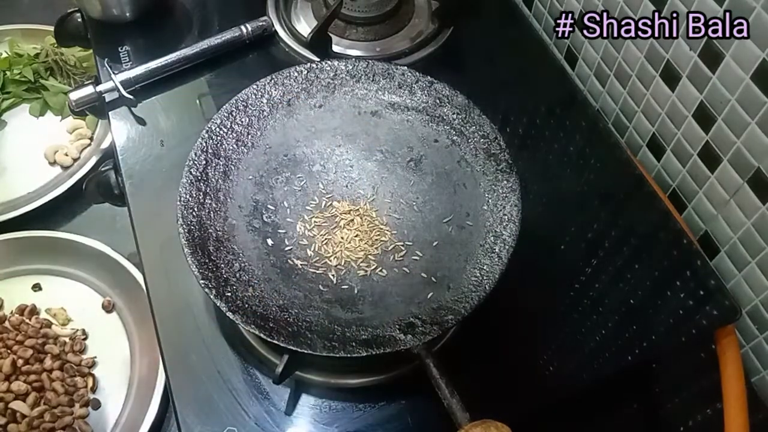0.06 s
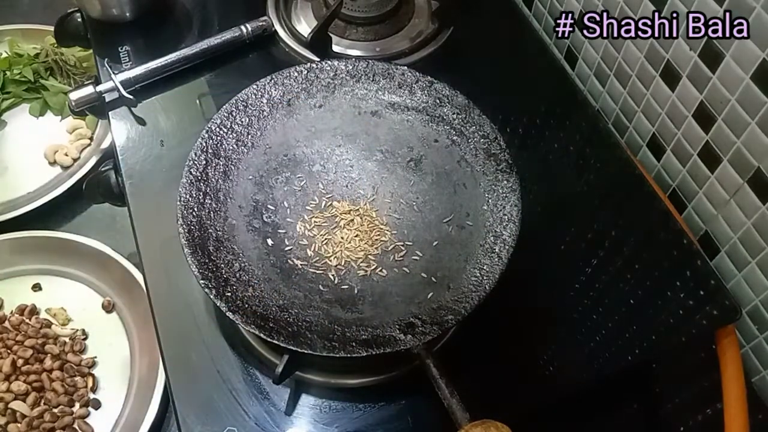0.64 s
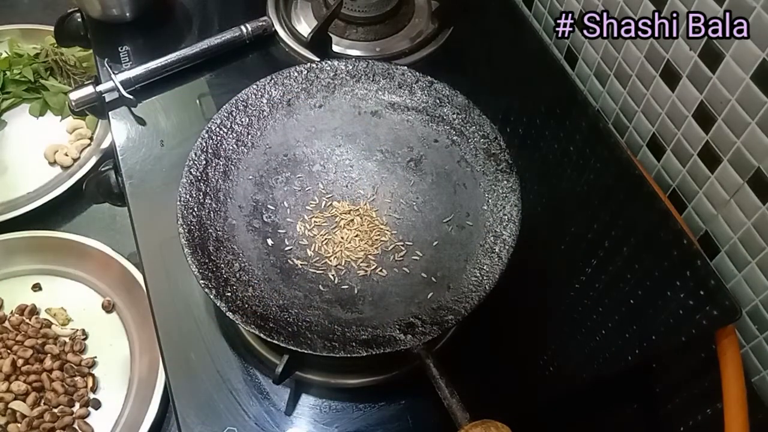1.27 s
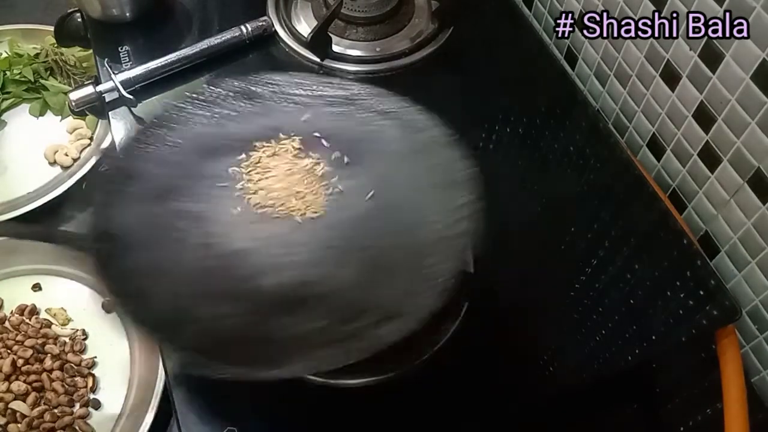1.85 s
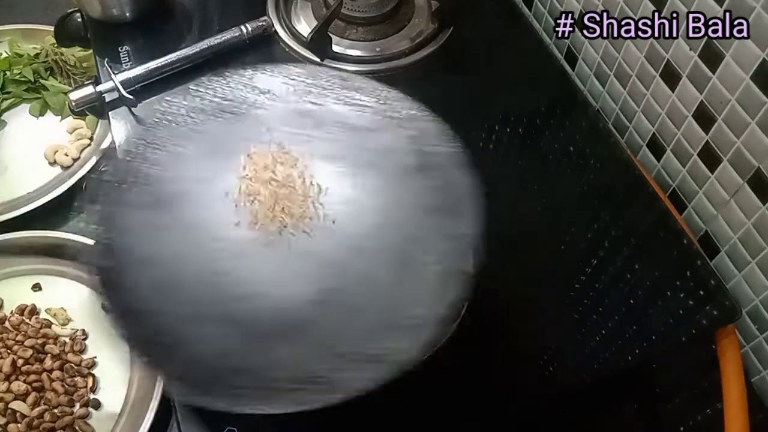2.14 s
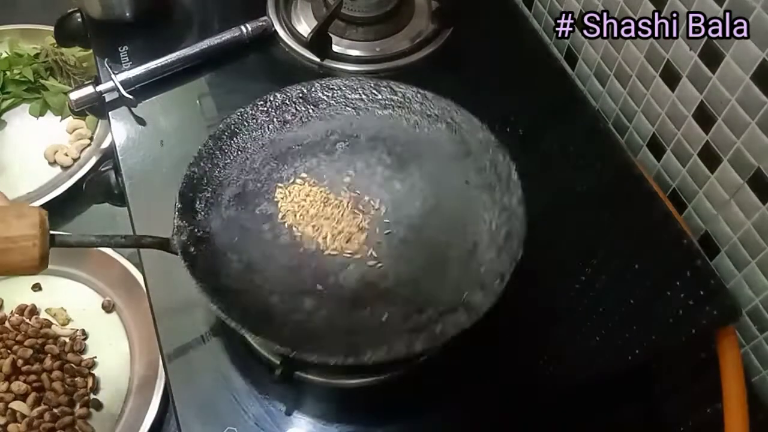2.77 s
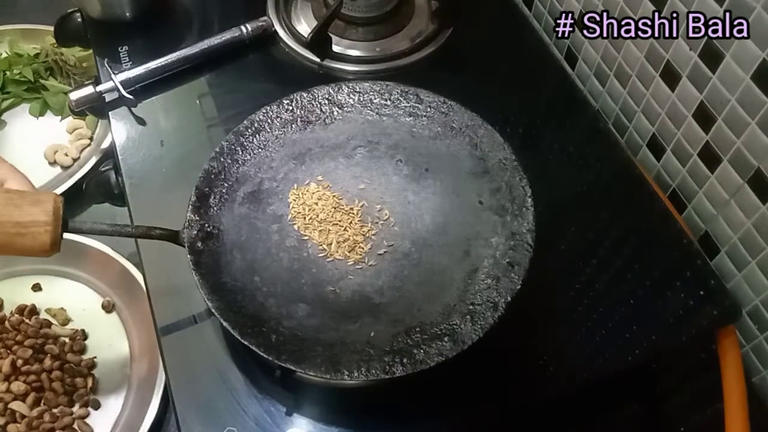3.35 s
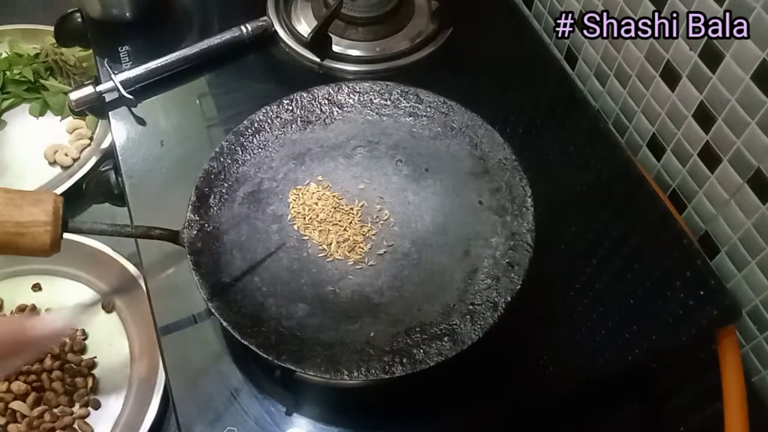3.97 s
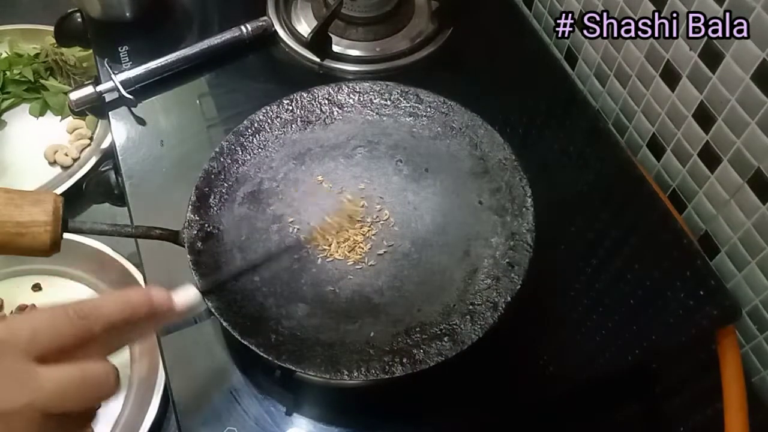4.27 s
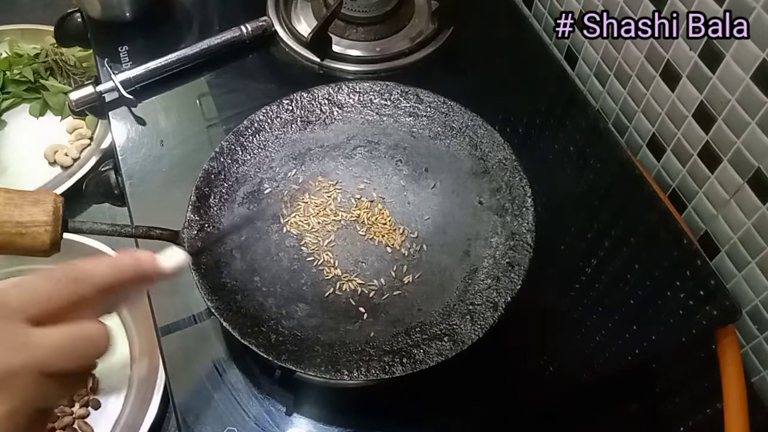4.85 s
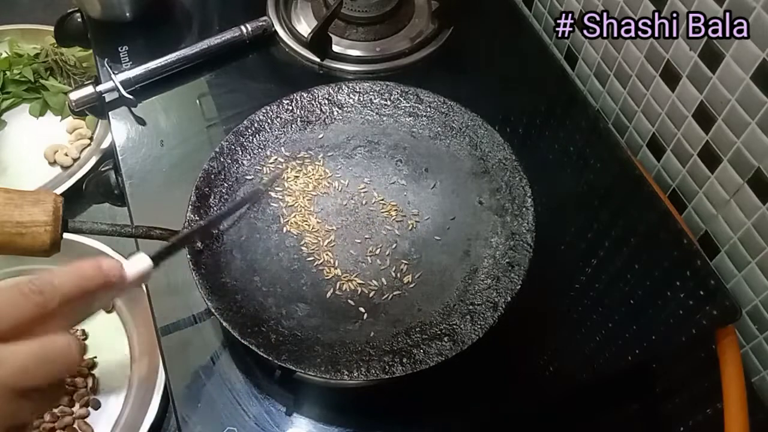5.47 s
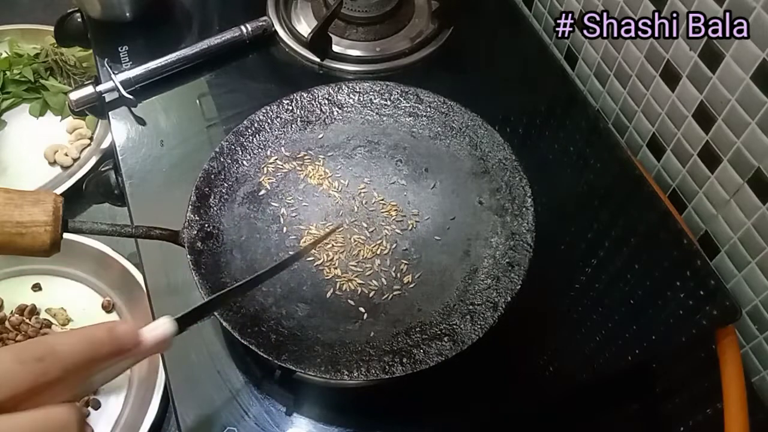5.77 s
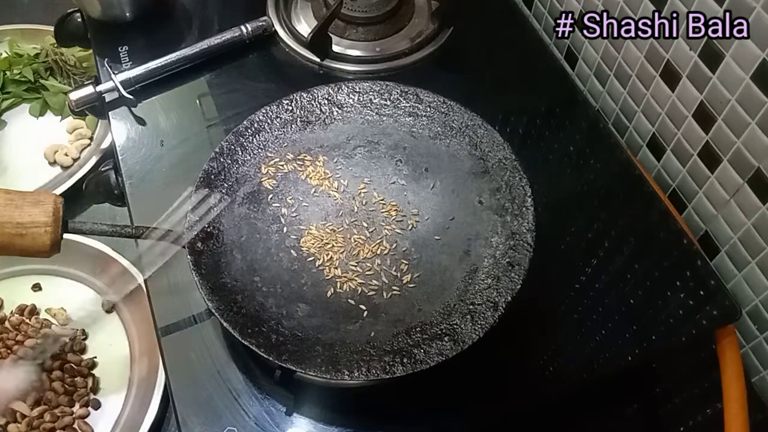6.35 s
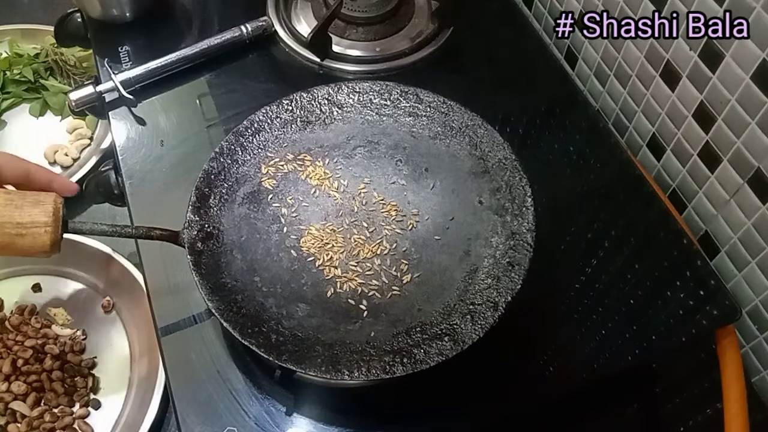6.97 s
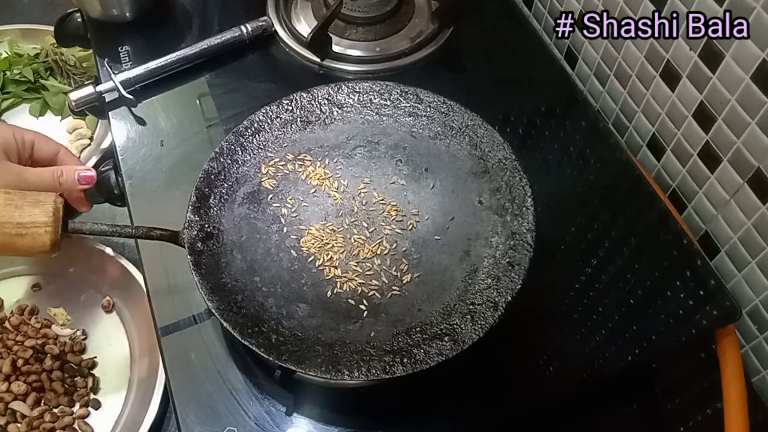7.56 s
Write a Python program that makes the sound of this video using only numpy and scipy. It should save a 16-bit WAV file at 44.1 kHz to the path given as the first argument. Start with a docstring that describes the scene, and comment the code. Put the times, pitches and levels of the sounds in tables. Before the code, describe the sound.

In a small, quiet kitchen, a nearby microphone picks up seeds popping one by one in a hot iron pan. The pan clanks down on its grate, and a spoon stirs with a few ringing scrapes. After the soft slide of a plate come two loud metallic knocks on the rim, then more snaps and light knocks on the counter. Faint raspy squeaks and a thin trill lie in the background.

```python
"""Seeds roast and crack in a heavy iron pan on a gas stove, heard on one microphone in a small tiled kitchen.
The iron rings as the pan is lifted, swirled and dropped back on its grate; a steel spoon stirs,
then knocks twice on the rim. Hot husks split with sharp snaps over a faint fizz, the counter takes
a few knocks and a plate is slid aside. Farther back are thin raspy squeaks and a faint trill."""
import sys
import numpy as np
from scipy import signal
from scipy.io import wavfile
from scipy.ndimage import uniform_filter1d, minimum_filter1d

SR = 44100
rng = np.random.default_rng(int(sys.argv[2]) if len(sys.argv) > 2 else 0)


def master_out(mix):
    """Clip the mix to full scale and print it as 16-bit PCM to the path in sys.argv[1]."""
    frames = np.transpose(np.atleast_2d(mix))
    ceiling = np.clip(frames, -1, 1)
    pcm = np.round(ceiling * 32767).astype(np.int16)
    wavfile.write(sys.argv[1], SR, pcm)


N = 340452
TIME = np.arange(N) / SR

# Blows around the stove. Each row: start in seconds, level in dB, bass in dB, treble in dB,
# ring against clatter in dB, factor on the decay time.
COUNTER_KNOCKS = [(.1083, -51.5, -15, 5, -33, 0.34), (.345, -37, -12, 20, -29, 0.34),
                  (7.4765, -38.5, -18, 3, -27, 1), (7.487, -33, -2, 3, -21, 1.0),
                  (7.592, -42.5, -13, -2, -33, 0.23), (7.676, -43, -7, -3, -20, 0.4)]
GRATE_BLOWS = [(1.828, -48.5, -6, 25, -13, 0.6), (2.9395, -22.5, 3.5, -3, 5.5, 0.67),
               (2.956, -17.5, -4.5, 3, -5, 1.01), (3.055, -20, 1, -1.5, -3, 1.005),
               (3.265, -40.5, 7.5, 2, -11, 1.27), (3.375, -43, 5, -8, -4, 1.13),
               (3.468, -36, 5, 3, -5, 0.58), (3.480, -34.5, -7.5, 21.5, -25, 0.72)]
SPOON_TOUCHES = [(4.2705, -23.5, -12.5, -6, 1, 0.99), (4.601, -44, 3, -29, -14, 0.27),
                 (4.622, -37, -7.5, -16.5, 5, 0.99), (5.239, -31.5, -9, -5.5, 3, 0.77),
                 (7.054, -33.5, -4.5, 11.5, -9, 0.58)]
RIM_KNOCKS = [(6.1203, -15, 2.5, -3.5, 0.5, 0.82), (6.3265, -13, -1, -1.5, 0.5, 0.89)]
# Raspy squeaks. Each row: start in seconds, length in seconds, level in dB, top pitch in Hz.
SQUEAKS = [(0, 0.14, -57.5, 1438), (1.293, 0.41, -58, 1466), (1.61, 0.32, -58, 1460),
           (1.977, 0.32, -46, 1452), (3.419, 0.5, -56.5, 1448), (4.142, 0.17, -51.5, 1420)]
# A squeak's partials. Each row: multiple of the pitch, width in Hz, relative level in dB.
SQUEAK_PARTIALS = [(1, 50, -3.5), (1.998, 213, 11), (2.34, 136, -9.5), (2.83, 181, -1), (3.69, 180, -4.5),
                   (4.08, 243, -1.5), (4.9, 690, -4)]
# Handling noises. Each row: start in seconds, level in dB, pitch in Hz, width in Hz, length in seconds.
BUMPS = [(0.99, -67, 950, 200, 0.11), (1.816, -49.5, 892, 70, 0.027), (1.87, -42, 478, 44, 0.04),
         (1.871, -48, 970, 300, 0.046), (1.865, -48, 3250, 1510, 0.052), (2.549, -56.5, 1730, 348, 0.03),
         (4.14, -53.5, 3970, 60.3, 0.055), (4.88, -59.5, 765, 98, 0.36), (4.915, -64, 1490, 86, 0.27),
         (5.361, -61, 411, 61, 0.41), (6.585, -41, 4120, 510, 0.038), (6.869, -60.5, 773, 88.7, 0.21),
         (7.037, -59.5, 666, 39.7, 0.3)]
# Sharp snaps: seeds cracking and, last, the hard click of a knock on the counter.
# Each row: start in seconds, level in dB, then low push and room against the snap in dB.
SNAPS = [(1.7228, -31, -35, -2), (2.2261, -11.5, 5.5, -2), (2.2886, -8.5, 5, 5), (2.4262, -19.5, -37, 0.5),
         (2.9486, -19, -33, 3), (3.3407, -10, -7, 2), (3.4803, -29, -13, 14.5), (3.643, -33.5, -23, 0.5),
         (3.9267, -21, -34, 4.5), (3.9784, -28.5, -24, -3), (4.2207, -10, -54, -1.5),
         (4.7326, -6.5, -31, 0.5), (4.8324, -6, 8, 2.5), (4.9476, -16.5, -32, 1.5), (6.4865, -18, -39, 4),
         (6.6124, -21.5, -28, 2), (7.2023, -30.5, -22, 4), (7.2112, -18.5, -38, 4),
         (7.2614, -13, -30, -2.5), (7.487, -15, -28, -2)]
# Strokes over the iron. Each row: start in seconds, length in seconds, level in dB, favoured note in Hz.
STROKES = [(1.763, 0.4, -55.5, 2426), (2.266, .14, -51, 2390), (2.478, 0.21, -49, 2356),
           (2.72, 0.081, -51, 2520), (4.302, 0.1, -25, 2493), (4.643, 0.082, -34.5, 2687),
           (4.987, 0.071, -43, 2450), (5.346, 0.12, -54.5, 2530), (5.476, 0.08, -61.5, 2380),
           (5.63, 0.083, -51, 2430)]

# The tone colour of each source. Each row: frequency in Hz, relative level in dB.
AIR_COLOUR = [(15, -43), (25, -8.5), (43, -10.5), (88, 5), (182, 2), (387, -3), (438, -3.5), (578, -1),
              (908, -0.5), (1260, -16), (2030, -11.5), (2240, -14), (2740, -20.5), (8290, -23),
              (10100, -56), (13200, -60), (22000, -120)]
COUNTER_COLOUR = [(35, -69), (60, -40), (307, 5.5), (547, -1.5), (636, 6), (977, -2), (1180, 1), (1290, -1),
                  (1600, -1.5), (3860, -11), (8000, -10.5), (10100, -26.5), (13200, -80), (22000, -120)]
SNAP_COLOUR = [(200, -27.5), (1000, -20), (2000, -14), (3500, -9.5), (6000, -4), (8000, -0.5), (9000, -6),
               (10500, -19.5), (14000, -37.5), (16000, -44)]
RUB_COLOUR = [(120, -72), (200, -21.5), (367, -13), (545, -29), (2060, -34.5), (2470, 4.5), (2680, -0.5),
              (2900, -10.5), (3250, -18.5), (3510, -4), (3800, -24.5), (4120, -10), (4350, -24.5),
              (6500, -18), (8600, -13), (10100, -28.5), (13200, -76.5), (22000, -120)]
GRATE_COLOUR = [(29, -64), (50, -43.5), (82, -16.5), (133, -29), (259, -6.5), (451, -11), (482, -5.5),
                (879, -2), (2090, -16), (2500, -9.5), (3730, -21.5), (5200, -26), (6940, -33),
                (8480, -28.5), (10100, -58), (13200, -74.5), (22000, -120)]
TOUCH_COLOUR = [(59, -86.5), (100, -31.5), (172, -16.5), (253, -4), (478, -8), (791, -8), (1060, -8),
                (1750, -28), (2380, -9.5), (2940, -7.5), (3430, -10), (5900, -5.5), (6620, -12.5),
                (8510, -7.5), (10100, -24), (13200, -50), (22000, -120)]
SLIDE_COLOUR = [(59, -53), (100, -37), (234, -29), (278, -16), (358, -18.5), (497, -6), (580, -21),
                (746, -9), (997, -12.5), (1650, -17), (3120, -24), (5670, -37.5), (8190, -40.5),
                (10100, -62), (13200, -107), (22000, -120)]
RIM_COLOUR = [(35, -69.5), (60, -32), (150, -40), (240, -15), (405, -13.5), (432, -3), (536, -27.5),
              (664, -3.5), (1060, -11.5), (1240, -4.5), (1380, -20.5), (1570, -7.5), (1940, -12.5),
              (2460, -5.5), (3860, -20), (4330, -22.5), (4714, -18.5), (4900, -26), (8530, -25.5),
              (10100, -46), (13200, -86), (22000, -120)]
# Modes of the iron pan and the cast grate. Each pair of lists: frequencies in Hz, strengths in dB.
PAN_HZ, PAN_DB = [435, 494, 672, 1197, 1247, 1593, 1711, 2066, 2327, 2402, 2534, 2665, 2729, 3010, 3214,
                  3495, 3632, 4140, 4340, 4530, 4714, 4827, 5021, 5299, 5528, 5705, 6060, 6124, 7187, 7260,
                  7435, 8290, 8560, 8839], [-9, -4, -6.5, -13.5, -6.5, 0.5, -1.5, 2, -10, 2, -3, -10.5, -5, 3.5, -2,
                                  -2, -2.5, 7.5, 9, 1.5, 3.5, 5, 7, 7, -0.5, 6, 6.5, 8.5, 0, 6, 3.5, 6.5,
                                  10, 6.5]
GRATE_HZ, GRATE_DB = [377, 490, 743, 1120, 1244, 2380, 2535, 2889, 3020, 3488, 4230, 4474, 4673, 5012, 8193,
                      8700], [-2.5, -6, -6.5, -9.5, -11, 2, 6, 8, -0.5, 6, 5.5, 4.5, -4, 6, 11.5,
                                        2.5]
# How kitchen, clatter and iron die away. Each row: frequency in Hz, nominal seconds to fall 60 dB.
ROOM_DECAY = [(200, 0.2), (2000, 0.24), (5000, 0.23), (9000, .21), (14000, 0.21)]
CLATTER_DECAY = [(100, 0.75), (400, 0.54), (1000, 0.48), (2500, 0.41), (5000, .33), (8500, 0.29),
                 (13000, 0.56)]
IRON_DECAY = [(430, 0.62), (900, 0.56), (1400, 0.82), (2100, 0.31), (4000, 0.36), (4750, 0.44), (6000, 0.4),
              (7300, 0.37), (9000, 0.19), (12000, 0.31)]


def amp(db):
    return 10 ** (np.asarray(db) / 20)


def unit_rms(x):
    return x / np.sqrt(np.mean(x ** 2) + 1e-20)


def value_at(points, hz):
    """A curve's value, on a log-frequency axis."""
    f, value = np.transpose(points)
    return np.interp(np.log(hz + 1), np.log(f + 1), value)


def add(mix, start, sound):
    """Lays a sound into the mix, start seconds in."""
    part = mix[max(round(start * SR), 0):][:len(sound)]
    part += sound[:len(part)]


def colour(x, points, size=4096):
    """Causal filter with the given spectrum, so attacks stay sharp."""
    log_gain = np.log(amp(value_at(points, abs(np.fft.fftfreq(size, 1 / SR)))))
    taps = np.fft.ifft(np.exp(np.conj(signal.hilbert(log_gain)))).real
    return signal.oaconvolve(x, taps[:size // 2])[:len(x)]


def resonate(x, hz, width_hz):
    """A steep resonance that can follow a moving frequency."""
    carrier = np.exp(2j * np.pi * np.cumsum(hz * np.ones(len(x))) / SR)
    pole = np.exp(-np.pi * width_hz / SR)
    return unit_rms((carrier * signal.lfilter([1], [1, -2 * pole, pole * pole], x / carrier)).real)


def dying_noise(decay, stretch=1, uneven=0):
    """One second of dense reflections, each band dying at its own speed; if uneven, some hang on."""
    hz, t, bands = signal.stft(rng.standard_normal(SR), SR, nperseg=256)
    t60 = value_at(decay, hz) * stretch * np.exp(uneven * (2 * rng.random(len(hz)) - 1))
    return signal.istft(bands * amp(-60 * t / t60[:, None]), SR, nperseg=256)[1][:SR]


def room(x):
    """What the kitchen tiles send back to the microphone: a short tail of unit energy."""
    tail = dying_noise(ROOM_DECAY)
    return signal.fftconvolve(x, tail / np.linalg.norm(tail))[:len(x)]


def ringing(modes, touch_db, stretch=1):
    """Struck iron's dying modes; where it is touched sets their phases and shifts their strengths."""
    t = np.arange(SR * 3 // 4) / SR
    out = np.zeros(len(t))
    for hz, db in modes:
        strength = amp(db + touch_db * (2 * rng.random() - 1))
        t60 = stretch * value_at(IRON_DECAY, hz)
        out += strength * amp(-60 * t / t60) * np.sin(2 * np.pi * (hz * t + rng.random()))
    return out


def stroke_shape(length, rise_s, release_s, sag_db_per_s):
    """Gain of one push of the hand: attack, a sagging hold, release."""
    t = np.arange(int(length * SR)) / SR
    return np.minimum(t / rise_s, 1) * amp(-sag_db_per_s * t) * np.minimum((length - t) / release_s, 1)


def friction(count, slips_per_s):
    """Tiny slips of random size at random moments."""
    return rng.standard_normal(count) * (rng.random(count) < slips_per_s / SR)


def room_tone():
    """The kitchen's own air, with a low hum and a faint hollow note."""
    noise = rng.standard_normal(N)
    air = amp(-75) * unit_rms(colour(noise, AIR_COLOUR))
    hum = amp(-79) * resonate(rng.standard_normal(N), hz=96, width_hz=6.7)
    hollow = amp(-80) * resonate(rng.standard_normal(N), hz=440, width_hz=30)
    return air + hum + hollow


def pan_fizz(start_db=-78, growth_db=14, warming_s=4):
    """The pan's faint fizz grows with the heat."""
    heat = 1 - np.exp(-TIME / warming_s)
    tilt = [(1500, 5), (3000, 3), (8500, -2.5), (10000, -17.5), (14000, -30.5)]
    return amp(start_db + growth_db * heat) * unit_rms(colour(rng.standard_normal(N), tilt))


def trill(pitches_hz=(2255, 2293), db=-71, fade_in_s=1.32):
    """In the background, two close tones beat against each other; they fade in and stay."""
    tones = sum(resonate(rng.standard_normal(N), hz, width_hz=10) for hz in pitches_hz)
    return amp(db) * unit_rms(tones) * np.minimum(TIME / fade_in_s, 1)


def squeaks(bend=0.054, skew=0.53, swell=2.06, room_db=-4):
    """Behind the pan, rough, fuzzy partials arch together in pitch and loudness."""
    out = np.zeros(N)
    for start, length, db, top_hz in SQUEAKS:
        progress = np.linspace(0, 1, int(length * SR), endpoint=False)
        hz = top_hz * (1 - bend * (1 - np.sin(np.pi * progress)))
        rasp = rng.standard_normal(SR)[:len(progress)]
        sound = sum(amp(part_db) * resonate(rasp, k * hz, width) for k, width, part_db in SQUEAK_PARTIALS)
        arch = np.sin(np.pi * progress ** skew) ** swell  # peaks early
        add(out, start, amp(db) * unit_rms(sound) * arch)
    return out + amp(room_db) * room(out)


def blows(rows, contact, modes, crack_db, crack_s=0.003, bloom=0.44, bloom_s=0.0076):
    """Each blow sets off a brief crack, a dense clatter and the body's ring, coloured by the contact."""
    out, t = np.zeros(N), np.arange(SR) / SR
    # after the crack, the clatter swells as reflections arrive
    attack = 1 + amp(crack_db) * np.exp(-t / crack_s) - bloom * np.exp(-t / bloom_s)
    for start, db, bass_db, treble_db, ring_db, stretch in rows:
        ring = unit_rms(colour(ringing(modes, touch_db=2, stretch=stretch), contact))
        reflections = attack * dying_noise(CLATTER_DECAY, stretch, uneven=0.4)
        clatter = unit_rms(colour(reflections, contact)[:len(ring)])
        sound = colour(clatter + amp(ring_db) * ring, [(800, bass_db), (2400, 0), (5000, treble_db)])
        add(out, start, amp(db) * sound / np.std(sound[:1764]))  # the first 40 ms set the level
    return out


def handling_bumps(room_db=-9):
    """Hollow bumps and thin chirps of handling, each a short swell of one resonance."""
    out = np.zeros(N)
    for start, db, hz, width, length in BUMPS:
        count = int(length * SR)
        note = resonate(rng.standard_normal(count), hz, width)
        add(out, start, amp(db) * note * signal.windows.tukey(count, 0.7))
    return out + amp(room_db) * room(out)


def sharp_snaps(ring_hz=7900, ring_s=0.00026, push_s=0.00027, bounce_s=0.0013, bounce_db=-12):
    """A husk splits or a knock clicks: a briefly ringing snap, a low push, a bounce, the room's tail."""
    out, t = np.zeros(N), np.arange(SR // 2) / SR
    snap = colour(signal.unit_impulse(len(t)), SNAP_COLOUR)
    snap /= abs(snap).max()
    ring = amp(-8) * np.sin(2 * np.pi * ring_hz * t) * (t / ring_s) * np.exp(1 - t / ring_s)
    push = colour((1 - t / push_s) * np.exp(-t / push_s), [(5000, -4), (12000, -22.5)])  # a seed's steam
    for start, db, push_db, room_db in SNAPS:
        add(out, start, amp(db) * (snap + ring + amp(push_db) * push + amp(room_db) * room(snap)))
        add(out, start + bounce_s, amp(db + bounce_db) * snap)
    return amp(-2) * out


def stirring(modes, rasp_db=-16, note_db=-5):
    """Seeds and spoon rub the iron: tiny slips keep its modes singing, in a new mix at each stroke."""
    singing, scraping = np.zeros((2, N))
    for start, length, db, hz in STROKES:
        shape = amp(db) * stroke_shape(length, rise_s=0.022, release_s=0.058, sag_db_per_s=15)
        slips = friction(SR // 2, slips_per_s=2500)
        rasp = shape * unit_rms(colour(slips, RUB_COLOUR)[:len(shape)])
        note = shape * unit_rms(resonate(slips, hz, width_hz=100)[:len(shape)])
        ring = signal.fftconvolve(rasp, ringing(modes, touch_db=5))
        add(singing, start, ring * np.linalg.norm(rasp) / np.linalg.norm(ring))
        add(scraping, start, amp(rasp_db) * rasp + amp(note_db) * note)
    return singing + room(scraping)


def pan_overtones(count=60, low_hz=2300, high_hz=12500):
    """The struck pan's crowd of weaker modes. Each row: frequency in Hz, strength in dB."""
    hz = rng.uniform(low_hz, high_hz, count)
    db = -5 + 4 * np.clip(rng.standard_normal(count), -2, 1)
    return np.column_stack([hz, db])


def plate_slide(start_s=5.708, length_s=0.55, db=-33.5):
    """A steel plate, pushed once, coasts over the counter; friction wakes its hollow note."""
    out, slips = np.zeros(N), friction(SR, slips_per_s=3000)
    sound = unit_rms(colour(slips, SLIDE_COLOUR)) + amp(-13) * resonate(slips, hz=490, width_hz=90)
    shape = stroke_shape(length_s, rise_s=0.045, release_s=0.02, sag_db_per_s=45)
    add(out, start_s, amp(db) * shape * unit_rms(sound[:len(shape)]))
    return room(out)


def scene():
    """Pan, spoon, grate and counter in front, the kitchen around them, all in one channel."""
    pan = np.column_stack([PAN_HZ, PAN_DB])
    grate = np.column_stack([GRATE_HZ, GRATE_DB])
    struck_pan = np.vstack([pan, pan_overtones()])
    mix = blows(RIM_KNOCKS, RIM_COLOUR, struck_pan, crack_db=-11.5)
    mix += blows(SPOON_TOUCHES, TOUCH_COLOUR, struck_pan, crack_db=-15.5)
    mix += stirring(pan)
    mix += blows(GRATE_BLOWS, GRATE_COLOUR, grate, crack_db=-2)
    mix += blows(COUNTER_KNOCKS, COUNTER_COLOUR, grate, crack_db=-9)
    mix += sharp_snaps() + plate_slide() + squeaks() + handling_bumps()
    mix += room_tone() + pan_fizz() + trill()
    return mix[None]


def record(dry, low_cut_hz=45, ceiling=0.82, top_hz=15400):
    """The microphone has a lift near 8.7 kHz and a low cut; a fast limiter and a low-pass follow."""
    heard = colour(dry[0], [(6500, 0.5), (8700, 3), (9400, 0), (14000, -1)])
    heard = signal.sosfilt(signal.butter(2, low_cut_hz, "high", fs=SR, output="sos"), heard)
    allowed_gain = np.minimum(1, ceiling / (abs(heard) + 1e-9))
    heard *= uniform_filter1d(minimum_filter1d(allowed_gain, size=129), size=129)
    low_pass = signal.firwin(511, top_hz, window=("kaiser", 9), fs=SR)
    return signal.oaconvolve(heard, low_pass, "same")[None]


dry = scene()
out = record(dry)
master_out(out)
```